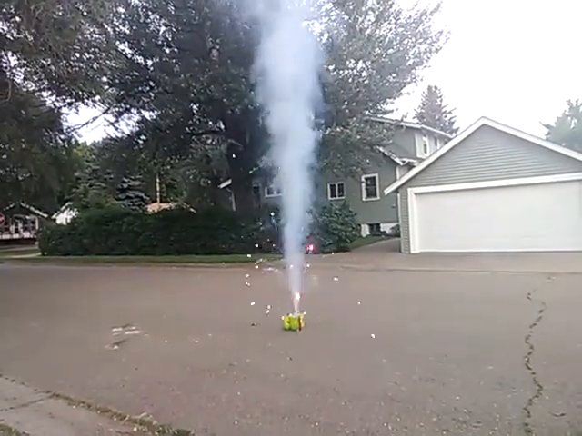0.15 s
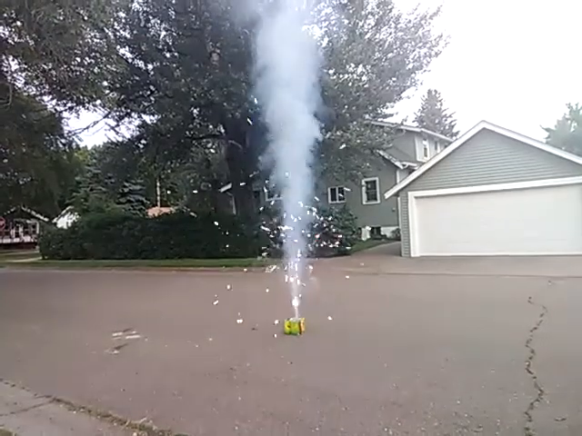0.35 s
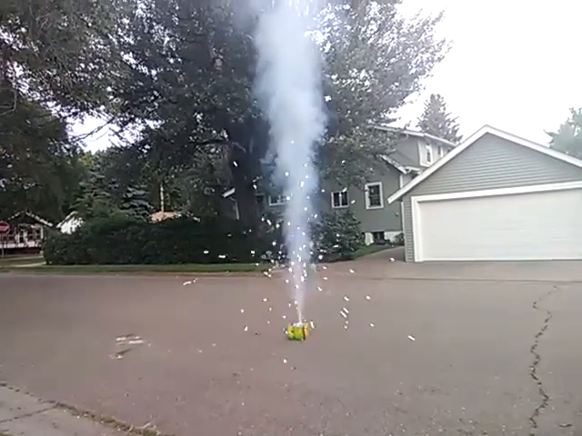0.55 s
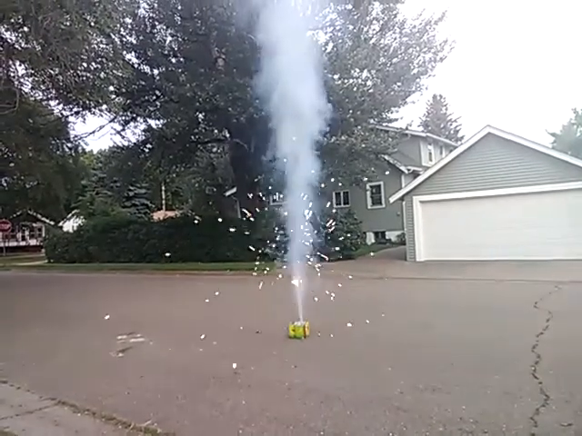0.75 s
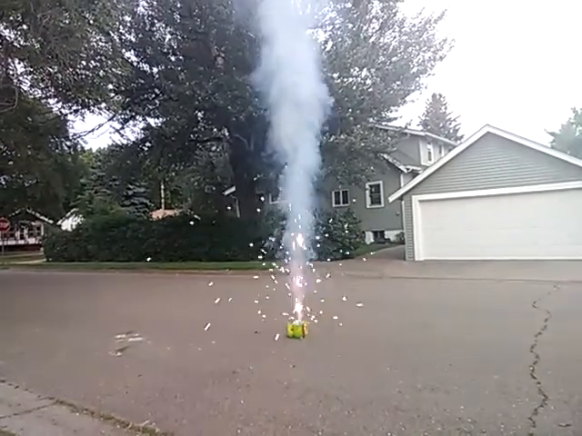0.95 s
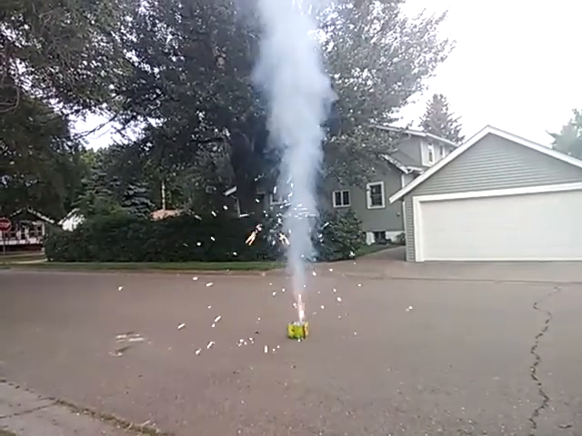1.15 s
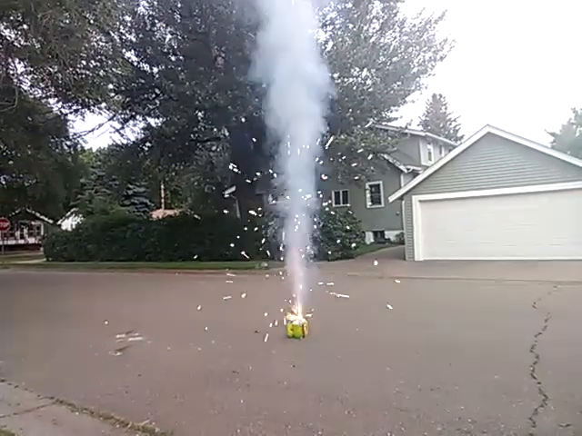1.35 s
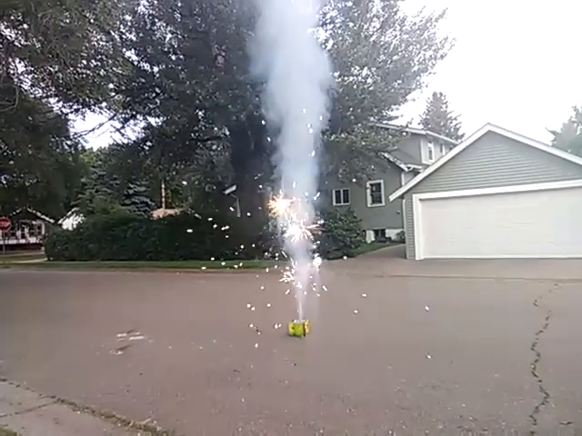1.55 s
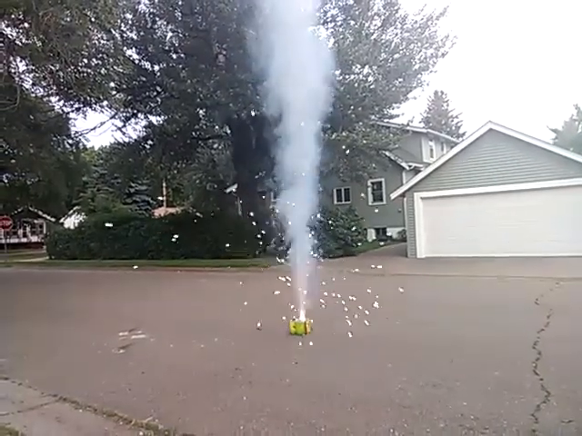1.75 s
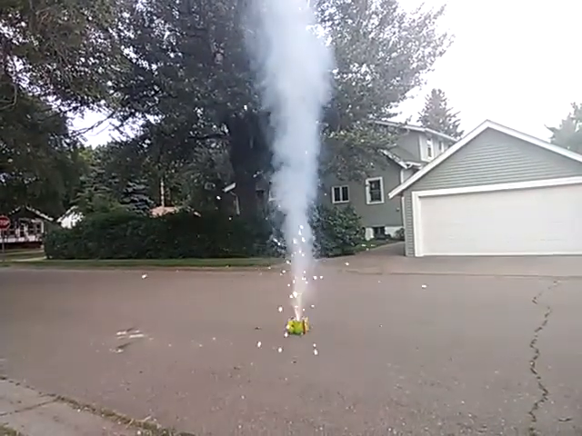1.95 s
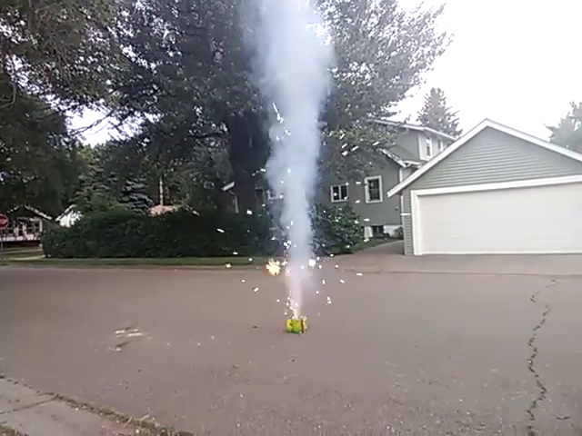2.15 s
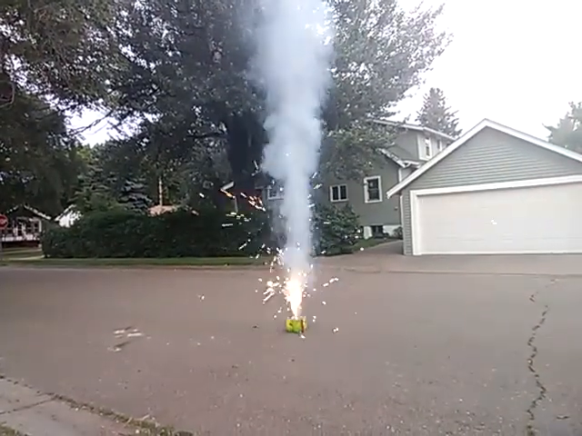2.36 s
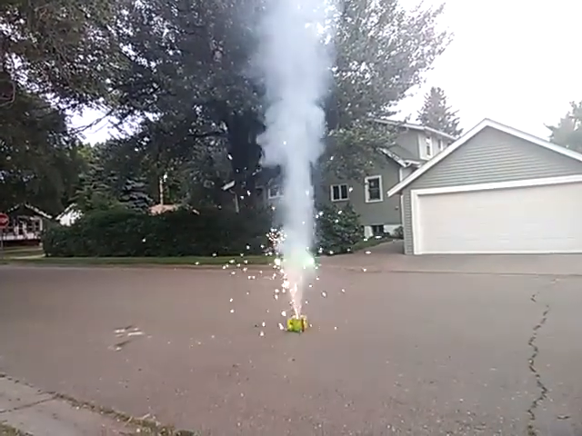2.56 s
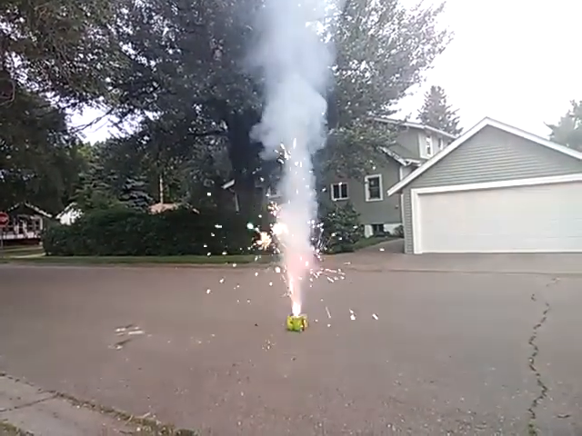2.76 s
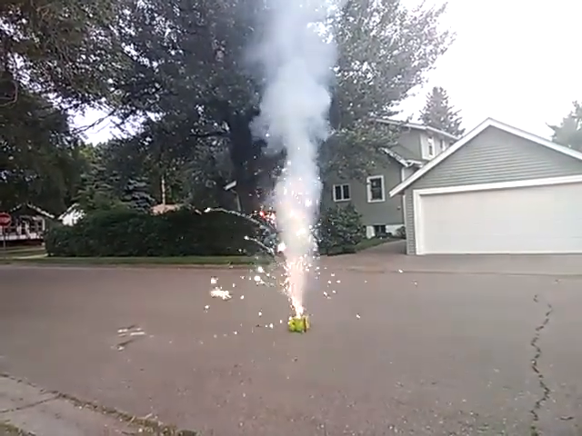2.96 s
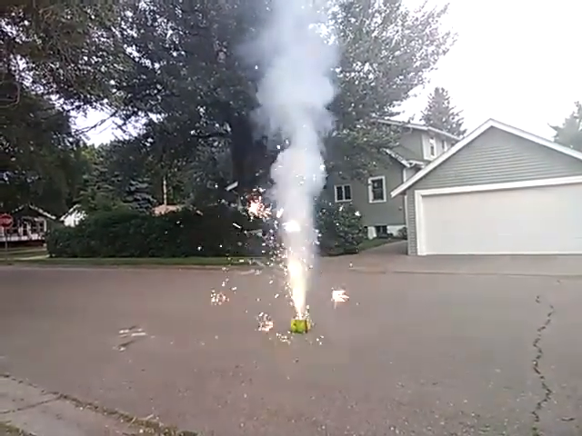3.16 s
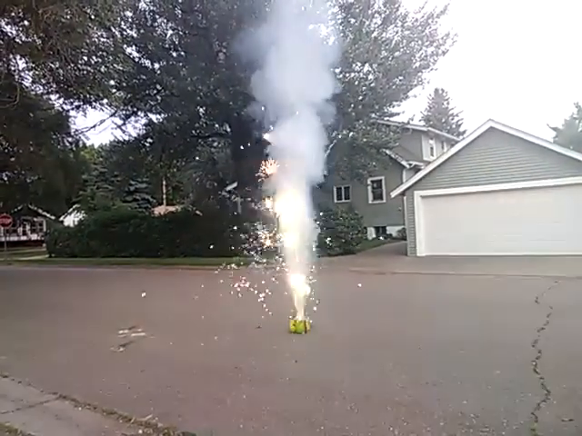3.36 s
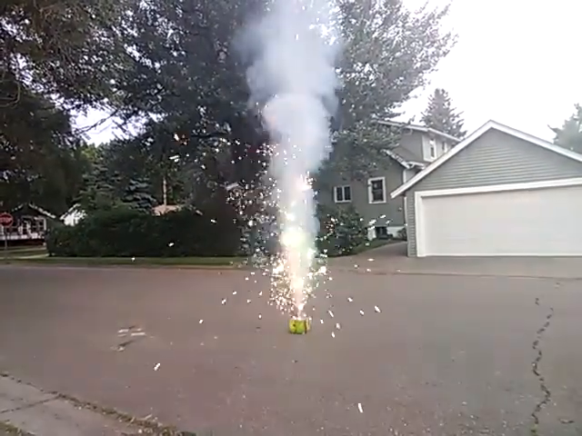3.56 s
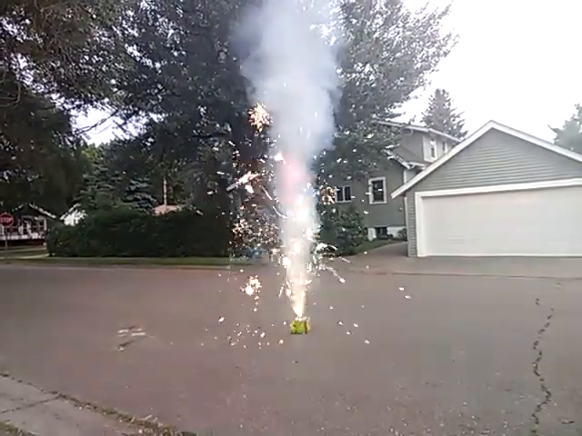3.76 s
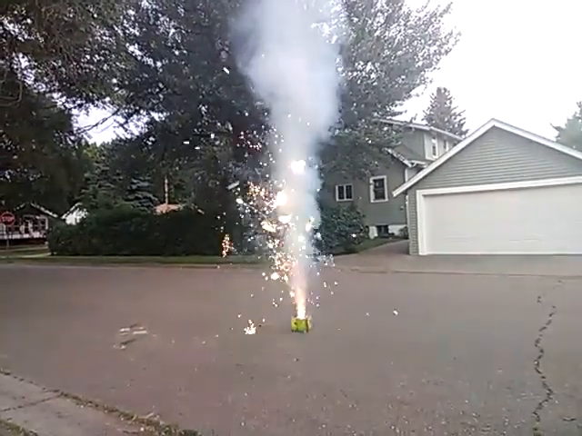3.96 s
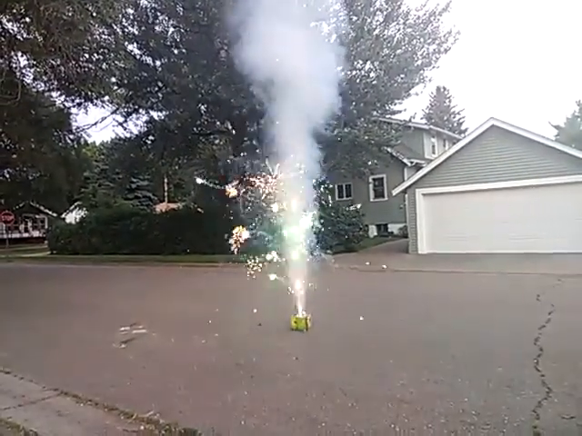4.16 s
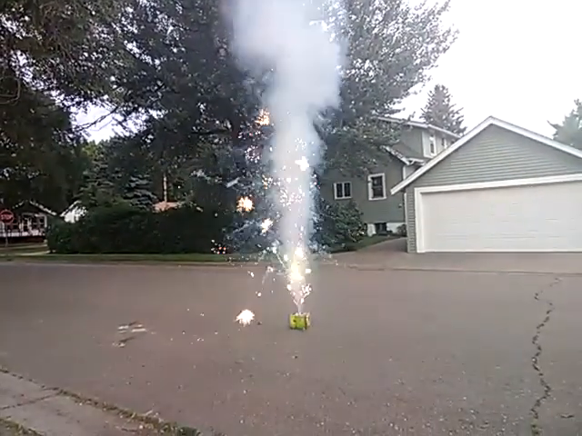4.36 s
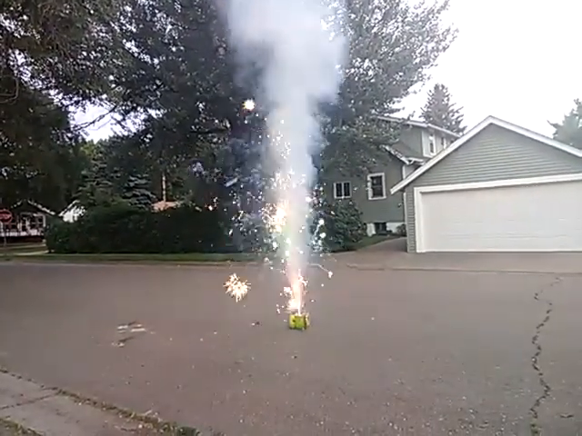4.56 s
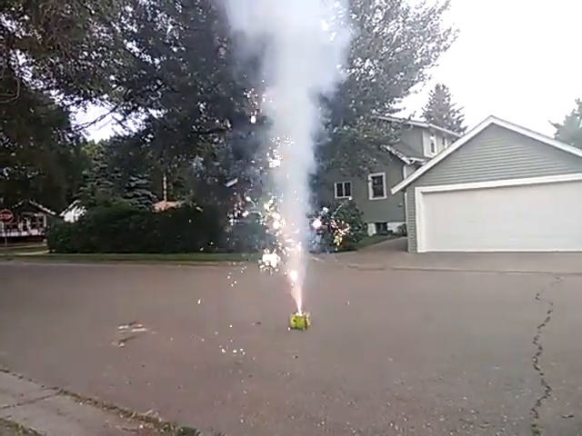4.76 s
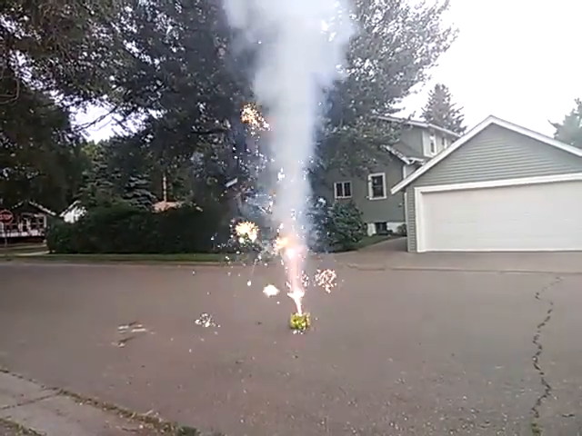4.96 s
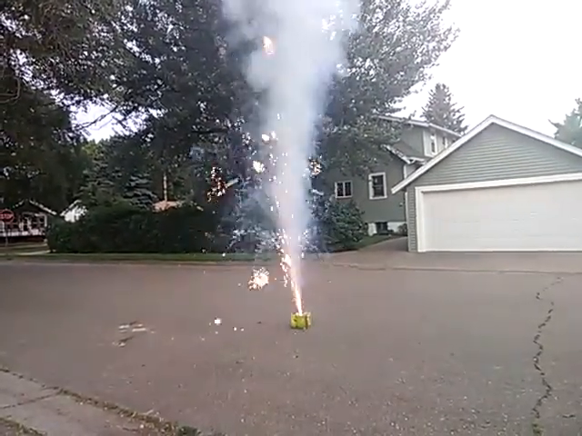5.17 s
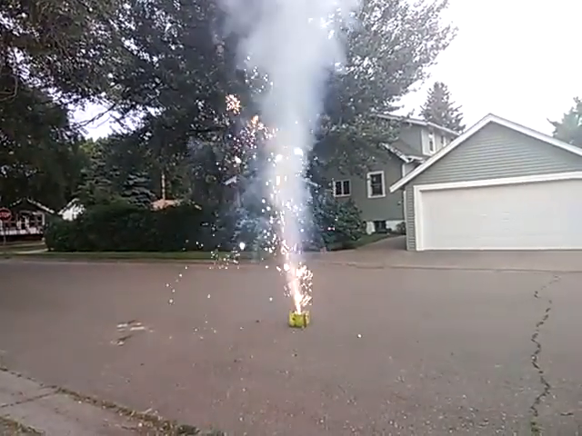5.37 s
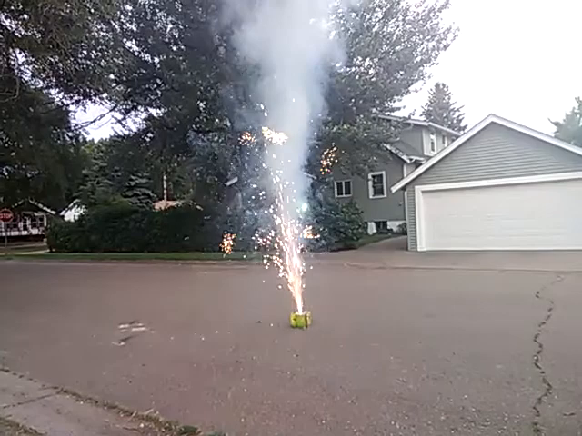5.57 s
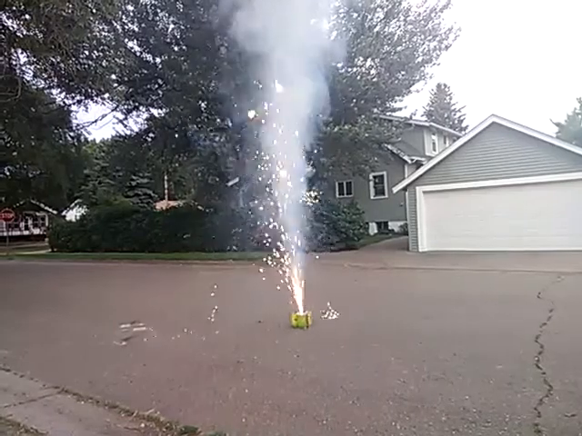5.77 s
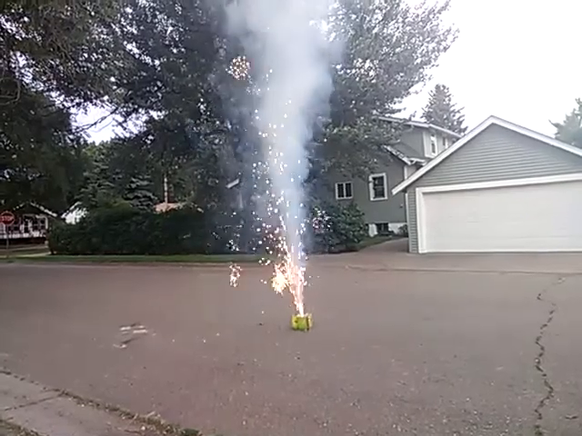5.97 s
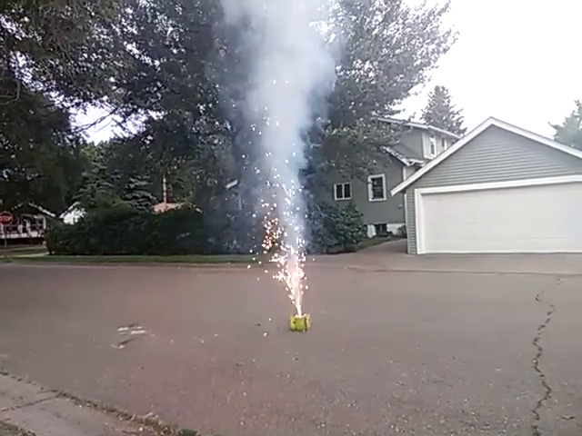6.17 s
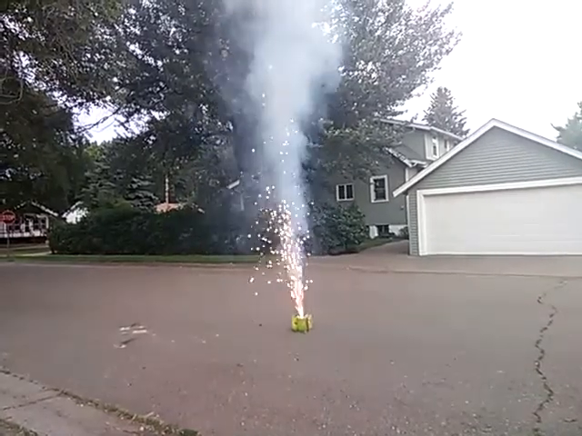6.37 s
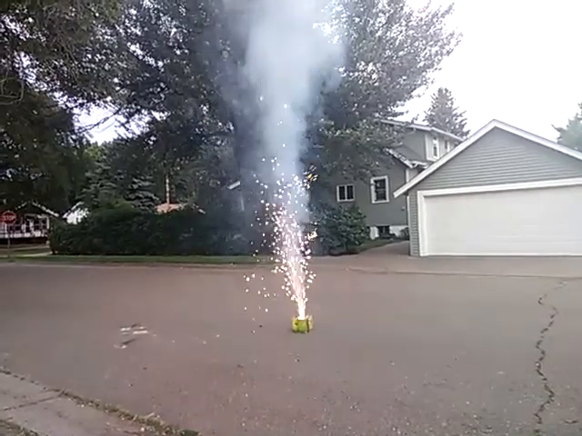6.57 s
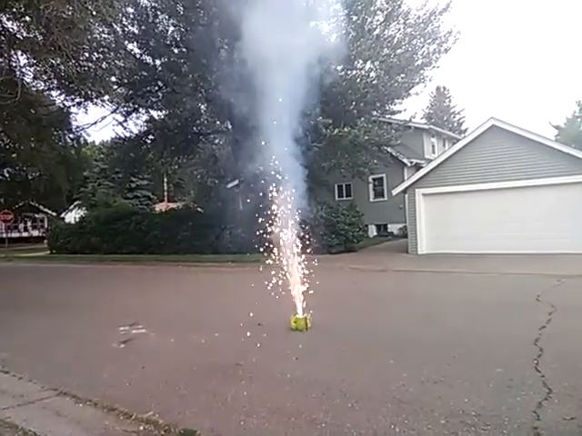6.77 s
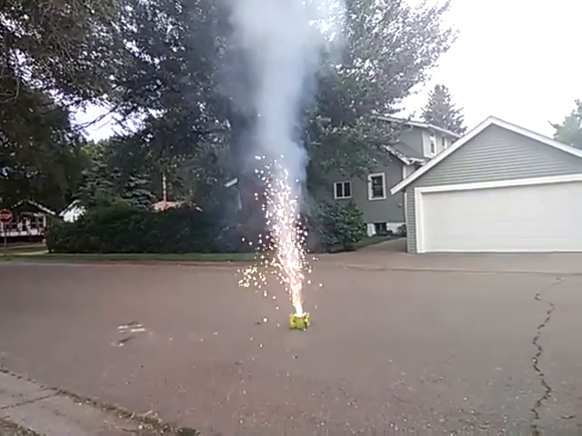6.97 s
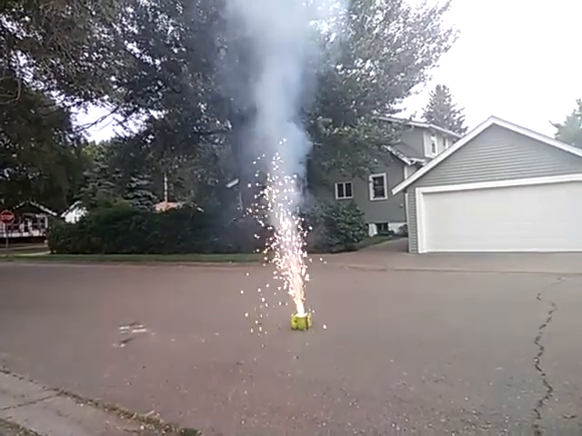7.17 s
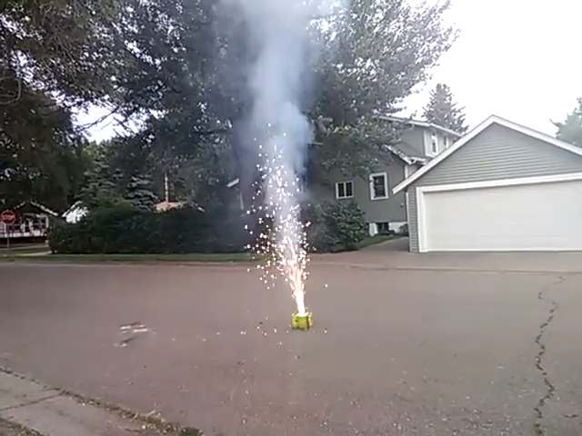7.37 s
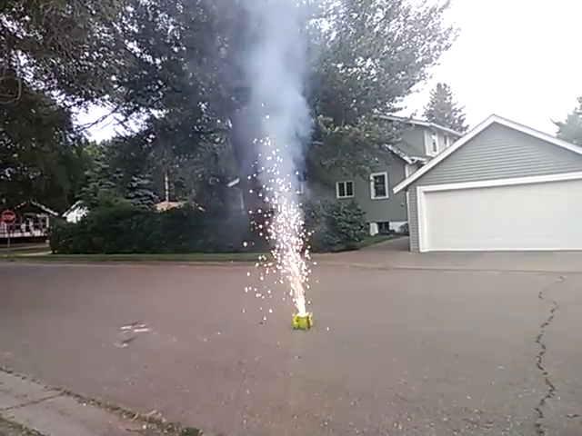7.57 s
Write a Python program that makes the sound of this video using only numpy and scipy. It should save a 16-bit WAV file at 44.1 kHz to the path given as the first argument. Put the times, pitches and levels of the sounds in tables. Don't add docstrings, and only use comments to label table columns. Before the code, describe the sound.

Rapid crackling bangs from a ground firework, bright and dry with thumping air pushes, thicken over the first seconds and bounce quickly off nearby house fronts. Then a lull with soft low gulps and a few ticks, a hissing jet that fades nearly out, coughing spurts, and a rougher, lower rushing roar. Faint street air and town hum lie beneath; close stereo microphone, slightly squashed.

```python
import sys
import numpy as np
from scipy import signal
from scipy.fft import rfft, irfft, next_fast_len
from scipy.io import wavfile
from scipy.ndimage import uniform_filter1d, map_coordinates

SR = 44100
rng = np.random.default_rng(int(sys.argv[2]) if len(sys.argv) > 2 else 0)


def unload_wav(signal):
    wavfile.write(
        sys.argv[1],
        SR,
        np.round(np.clip(np.atleast_2d(signal).T, -1, 1) * 32767).astype(np.int16),
    )


def linear_from_db(decibels):
    return 10 ** (np.asarray(decibels, float) / 20)


N = 335601

# (peak time [s], level [dB], left-right [dB], brightness [dB])
EARLY_STARS = [(0.0119, -18, 2, 1), (0.0239, -23, -11, 0), (0.0361, -15, -1, 0), (0.0627, -28, -1.5, -1),
               (0.0795, -14, -1, 2.5), (0.1928, -17.5, -2, 1), (0.2596, -28, -2, 7), (0.2774, -12, -2, 0.5),
               (0.2843, -9.5, -2, -4), (0.3559, -8.5, -2, 3.5), (0.3727, -10.5, 7, 0), (0.3863, -15, -2, 3),
               (0.4086, -19, 3, -1), (0.42, -6.5, 1, 3), (0.4341, -20, -13, -1), (0.4403, -15, 8, -1.5),
               (0.4717, -25, -5, 12), (0.4857, -13, 4, 1), (0.4906, -7.5, 1, 2.5),
               (0.5062, -11.5, -4, -0.5), (0.5599, -11.5, 2, 0), (0.5741, -28, -5, 6), (0.5807, -33, -8, 8),
               (0.5907, -6.5, 0, 1), (0.5999, -5, -2, -1.5), (0.6115, -9, 5, 1), (0.6162, -25, 2, 4),
               (0.6674, -10, 5, 4), (0.6759, -7.5, 0, 0), (0.6846, -9, -4, 0.5), (0.6992, -17, -2, -1),
               (0.7159, -6, 5, 0), (0.7268, -15, -3, 5), (0.7311, -5.5, 5, 1), (0.751, -21, -5, 5),
               (0.7825, -6.5, 4, 4), (0.7954, -12, 4, 1.5), (0.8063, -21, -2, -3), (0.814, -15, -3, 1),
               (0.8304, -9.5, 1, 0.5), (0.8444, -15, -4, 3), (0.897, -16.5, 1, 2), (0.92, -15.5, -1, -1.5),
               (0.927, -18, 2, -1), (1.0024, -3.5, -2, -1), (1.0105, -6.5, -3, 2.5), (1.022, -10, 3, -2.5),
               (1.0579, -35, -3, -1)]
MIDDLE_STARS = [(1.076, -4.5, 1, 3), (1.089, -4.5, 0, -0.5), (1.103, -16, 7, -2.5),
                (1.1291, -12.5, -2, -3.5), (1.1498, -24, 5, 11), (1.1553, -17, 1, 1), (1.205, -12, -7, 3.5),
                (1.2124, -5.5, 5, -0.5), (1.228, -14, 0, 3.5), (1.242, -12.5, -3, -1), (1.256, -18, 1, 0.5),
                (1.282, -11, 0, 1), (1.295, -11, 1, 3.5), (1.31, -9, -1, 0), (1.3221, -5.5, -1, 2),
                (1.3379, -11, 7, -1), (1.352, -23, -3, 8), (1.36, -13, -5, 0), (1.3744, -24, -8, -4),
                (1.3858, -8.5, 11, 3.5), (1.4039, -3, -4, -3), (1.4191, -11, 0, 3.5), (1.4415, -10.5, 4, 0),
                (1.4571, -23, 5, 3), (1.47, -10.5, -11, -1), (1.494, -8, 0, 1), (1.4983, -9, 2, 0.5),
                (1.5106, -26, 5, -3), (1.5366, -3.5, 3.5, 1), (1.5628, -16, 2, -3), (1.573, -12, -3, 3.5),
                (1.5795, -13.5, 2, -1), (1.5943, -14, 9, 3.5), (1.602, -22, 5, -4), (1.639, -20, -6, 3),
                (1.648, -12, -5, 0.5), (1.6609, -2.5, -1, -1.5), (1.6748, -9, -3, 3), (1.6794, -21, -1, -5),
                (1.685, -23, 3, 7), (1.69, -17, -1, -2), (1.701, -7.5, -5, 1.5), (1.707, -9, 12, 1),
                (1.7332, -15, 4, 1), (1.7444, -17.5, 12, -5), (1.7743, -17.5, 17, -1), (1.7909, -6, -4, -3),
                (1.8147, -17.5, 8, -5.5)]
LATE_STARS = [(1.8722, -24, 16, 0), (1.8921, -14, 4, -1), (1.923, -1, -1, -0.5), (1.9306, -3.5, -1, 5),
              (1.9336, -3, -4, -0.5), (1.943, -23, -1, 7), (1.949, -16, -6, 7.5), (1.9599, -17, -3, 0),
              (1.9903, -12.5, 9, 1.5), (2.0015, -18.5, -5, -2.5), (2.1425, -6.5, -0.5, 1),
              (2.1569, -20, -1, 2.5), (2.2047, -7, -3, 2), (2.2092, -7.5, 9, 3), (2.2199, -11.5, -1, -3.5),
              (2.2348, -17, -1, -1.5), (2.2726, -29, 2, -1), (2.2866, -14, -11, 1.5), (2.3035, -14, 15, 1),
              (2.3801, -6, 0, 2), (2.421, -16.5, -6, -2), (2.429, -6, -1, -2), (2.441, -4.5, 6, 3.5),
              (2.4673, -20, -8, 1), (2.5014, -12.5, 8, 0), (2.512, -13, -11, -1), (2.5467, -22, -2, 2),
              (2.557, -5.5, 2, 0.5), (2.5835, -15, 4, -1), (2.5961, -7.5, -1, 2.5), (2.625, -14, -1, 2),
              (2.709, -13.5, -7, 0.5), (2.7136, -11, 4, -0.5), (2.721, -12, -4, 3.5), (2.7352, -15, 2, 2),
              (2.746, -10, 3, 0), (2.762, -6.5, -4, -1), (2.7768, -6.5, 4, 0.5), (2.7864, -0.5, -3, 1),
              (2.7992, -10.5, -4, 2), (2.8292, -21, 1, -2.5), (2.8539, -4, -2, -0.5), (2.872, -11.5, 2, 4),
              (2.9153, -9.5, -3, -1), (2.9229, -15, -1, 4), (3.0016, -13, -3, 0), (3.0191, -20, 0, 4.5),
              (3.065, -19, 1, -5), (3.0693, -12, -2, 1)]
LAST_STARS = [(3.0769, 0, 0.5, -1.5), (3.0912, -10, -1, -3), (3.1012, -7.5, -1, 0), (3.1149, -2.5, 7, 0),
              (3.143, -15.5, -9, -2), (3.1748, -17, -11, -1.5), (3.1825, -12, -3, 3),
              (3.2008, -30, 3, -7.5), (3.236, -3, -8, -1), (3.285, 1.5, 1, 1), (3.2993, -5, -1, -4.5),
              (3.333, -12, -1, -1), (3.3542, -18, 12, -2), (3.371, -19.5, -5, -5), (3.391, -16.5, -3, -4.5),
              (3.4728, -0.5, 0.5, 0), (3.486, -19, 1, -1.5), (3.54, 0.5, -3, 0.5), (3.557, 0, 11.5, -4.5),
              (3.5837, -14, -5, 4), (3.594, -0.5, -7, -1), (3.6165, 3, 3, 0.5), (3.634, -16.5, -1, -6),
              (3.667, -4.5, 3, 1.5), (3.683, -11, 1, -1), (3.7068, -10, 18, 0.5), (3.7165, -11.5, -11, 1.5),
              (3.7355, -22, -2, -4), (3.7496, -5.5, -3, -2), (3.7892, -7.5, -4, 2.5), (3.8014, -2.5, 3, -1),
              (3.8162, -6, 4, 4.5), (3.8204, -5, 0, 0.5), (3.836, -7, 2, 0), (3.8546, -14, 5, 9),
              (3.869, -9, -3, 0), (3.885, -11, -6, -2.5), (3.8966, -13, 1, 3.5), (3.9213, -26, 3, -7),
              (3.933, -19, -9, 6), (3.9684, -7, 1.5, -0.5), (3.9826, -31, 1, 18), (4.0364, -14, -5, 1),
              (4.1488, -4, -11, -0.5), (4.1651, -2, -8, -1), (4.183, -9, 6, -3), (4.1918, -27, 15, -3),
              (4.2566, -9.5, -0.5, -0.5)]
# (time [s], peak [dB])
BLASTS = [(0.282, -28), (0.563, -4.5), (0.5983, -28), (0.683, -16), (1.09, -13), (1.2153, -41),
          (1.464, -8.5), (1.706, -6), (1.744, 9.5), (1.792, -36), (1.813, -3), (1.9229, 1), (1.968, -11),
          (2.38, -33), (2.5589, -8), (2.5841, -5.5), (2.7844, -7.5), (2.9166, -7.5), (3.069, -2.5),
          (3.075, -27), (3.102, -17), (3.283, 8.5), (3.471, -17), (3.544, 5.5), (3.561, -3), (3.602, -5),
          (3.754, -11), (3.9722, -4.5), (4.175, -11)]
# (start [s], length [s], level [dB], rasp over it [dB])
GUSTS = [
    (6.465, 0.071, -55.5, -8),
    (6.575, .03, -62, -20),
    (6.628, .03, -66, -20),
    (6.685, 0.045, -51.5, -0.5),
    (6.775, .04, -54, -19),
    (6.821, 0.015, -48.5, 3.5),
    (6.841, 0.046, -54, -17),
    (6.912, 0.042, -46, -17),
    (7.128, 0.123, -52.5, -25),
]
# (frequency [Hz], density [dB per Hz])
CRACK = [(710, -21.5), (1200, -7), (1670, -13), (2030, -10), (4280, 0.5), (7080, -2.5), (10700, -0.5),
         (13900, -10.5), (14600, -12), (15600, -30)]
# (frequency [Hz], density [dB per Hz])
RUMBLE = [(20, -53), (42, -16), (68, -8.5), (125, -12), (190, -24.5), (400, -36)]
# (frequency [Hz], likeness [0..1])
POP_ALIKE = [(130, 0.99), (300, 0.89), (640, 0.72), (1400, 0.16), (15000, 0.0056)]
# (frequency [Hz], likeness [0..1])
JET_ALIKE = [(130, 0.98), (640, 0.98), (1400, 0.67), (3100, 0.81), (5000, 0.45), (15000, 0.23)]


def unit(x):
    return x / np.sqrt(np.mean(x ** 2) + 1e-20)


def along(points, hz):
    f, v = np.transpose(points)
    return np.interp(np.log(hz + 1), np.log(f + 1), v)


def gains(rows):
    s, *columns = np.transpose(rows)
    now = np.arange(N) / SR
    return [linear_from_db(np.interp(now, s, db, left=-120, right=-120)) for db in columns]


def wobble(rate):
    coarse = np.arange(0, N + 8, 8)
    knots = rng.standard_normal(int(N * rate / SR) + 6)
    return np.interp(np.arange(N), coarse, map_coordinates(knots, [coarse * rate / SR]))


def filtered(x, response):
    m = next_fast_len(N + SR // 2)
    hz = np.fft.rfftfreq(m, 1 / SR) + 1e-3
    return irfft(rfft(x, m) * response(hz), m)[..., :N]


def rush(spectrum, alike, flutter_db, rate):
    def colour(hz):
        turn = np.arccos(np.clip(along(alike, hz), -1, 1)) / 2
        return linear_from_db(along(spectrum, hz)) * [np.cos(turn), np.sin(turn)]

    mid, side = filtered(rng.standard_normal((2, N)), colour)
    return unit(linear_from_db(flutter_db * wobble(rate)) * [mid + side, mid - side])


def strikes(s, db):
    at = np.clip(np.round(s * SR).astype(int), 0, N - 1)
    return np.bincount(at, linear_from_db(db), N)


def swells(s, db, rise, fall):
    t = np.arange(-SR // 50, SR // 50 + 1) / SR
    shape = np.where(t < 0, np.exp(-(t / rise) ** 2), np.exp(-np.abs(t) / fall))
    return signal.fftconvolve(strikes(s, db), shape, "same")


def fronts(s, db, rise, fall, ring_hz, damping, uneven_db):
    def low_cut(hz):
        return (hz ** 2 / (ring_hz ** 2 - hz ** 2 + 2j * damping * hz * ring_hz)) ** 2

    lean_db = uneven_db * rng.standard_normal(len(s))
    pulses = [swells(s, db + side * lean_db, rise, fall) for side in (1, -1)]
    return filtered(np.array(pulses), low_cut)


def mottled(x, patchy_db):
    z = signal.stft(x, nperseg=128)[2]
    field = uniform_filter1d(rng.standard_normal(z.shape[1:]), size=4, axis=0)
    field = uniform_filter1d(field, size=3, axis=1)
    spots = signal.istft(z * linear_from_db(patchy_db * unit(field)), nperseg=128)[1][:, :N]
    power = np.abs(uniform_filter1d(spots ** 2, size=180))
    return spots / np.sqrt(power + 1e-9)


def arrivals():
    # (peak time [s], level [dB],
    # left-right [dB], brightness [dB])
    further_arrivals = [(.0006, -14.5, 10, 2), (0.097, -26, 7, 3), (0.2098, -30, 4, 8), (0.407, -18, 3, 0),
                        (0.625, -33, 0, 4), (.743, -23, -2, -4), (2.3186, -22, 0, 1), (2.982, -19, -2, 3),
                        (3.2509, -21, 2, -3), (4.051, -31, 0, -3), (2.93, -14, -2, 0.5)]
    # (delay [s], loss [dB], left-right [dB], brightness [dB])
    walls = [
        (-.0007, 4, 2, 0),
        (.0009, 0, 1, -1),
        (0.0171, -8, 2.5, 0.5),
        (.064, -13.5, 4.5, 1.5),
        (0.069, -14.5, -1, 0.5),
    ]
    bursts = np.vstack([EARLY_STARS, MIDDLE_STARS, LATE_STARS, LAST_STARS, further_arrivals]) + [0, 5.5, 0, 0]
    paths = bursts[:, None] + np.array(walls)[None]
    scatter = [0.00047, 3]  # s, dB
    paths[:, 1:, :2] += rng.standard_normal((len(bursts), len(walls) - 1, 2)) * scatter
    return paths.reshape(-1, 4).T


def stars():
    # (frequency [Hz], density [dB per Hz])
    body_colour = [(88, -33), (150, 5.5), (522, -5), (715, 1.5), (1660, -10.5), (2200, -1.5), (2860, -1.5),
                   (4840, -120)]
    s, db, pan_db, tilt_db = arrivals()
    body_db, push_db, low_db = (rng.standard_normal((len(s), 3)) * [3, 4, 4]).T

    def under(hz, edge_hz):
        return 1 / (1 + (hz / edge_hz) ** 6)

    # (share of power, lean of each star in dB)
    parts = [(lambda hz: under(hz, 3200), low_db - 2.67 * tilt_db - 2.5),
             (lambda hz: under(hz, 6500) - under(hz, 3200), -1.3 * tilt_db),
             (lambda hz: 1 - under(hz, 6500), 0.99 * tilt_db)]
    crack = 0
    for share, lean_db in parts:
        noise = mottled(rush(CRACK, POP_ALIKE, flutter_db=2.5, rate=900), patchy_db=2.5)
        noise = filtered(noise, lambda hz: np.sqrt(np.abs(share(hz))))
        level_db = db + lean_db - 1.5
        crack = crack + noise * [swells(s, level_db + side * pan_db / 2, rise=.0003, fall=.001)
                                 for side in (1, -1)]
    body = swells(s, db + body_db - 1.3 * tilt_db - 22.0, rise=0.0019, fall=0.0024)
    body = body * rush(body_colour, POP_ALIKE, flutter_db=1.5, rate=330)
    push = fronts(s, db + push_db - 23.0, rise=0.00024, fall=0.0016,
                  ring_hz=58.6, damping=0.64, uneven_db=2.0)
    return crack + body + push


def blasts():
    s, db = np.transpose(BLASTS)
    return linear_from_db(-6.0) * fronts(s, db, rise=0.000096, fall=0.00079, ring_hz=52.7, damping=0.38, uneven_db=1.5)


def sparks():
    # (time [s], level [dB])
    swarm = [(0, -8.5), (.29, -86), (.55, -21), (1.0, -47), (1.36, -25), (1.6, -27), (2.12, -27.5),
             (2.7, -30.5), (3.1, -33.5), (3.35, -17.5), (3.8, -29.5), (4.25, -23.5), (4.45, -42)]
    families = np.vstack([EARLY_STARS, MIDDLE_STARS, LATE_STARS, LAST_STARS])
    born, parent_db = families.T[:2, :, None]
    wait, size = rng.random((2, len(born), 8))
    s = born - 0.025 * np.log(wait)
    db = 0.4 * parent_db + 20 * size ** 3
    grains = swells(s.ravel(), db.ravel(), rise=0.0005, fall=0.0028)
    crackle = (grains + 0.22) * rush(CRACK, POP_ALIKE, flutter_db=-1.0, rate=11)
    return linear_from_db(3) * gains(swarm)[0] * unit(crackle)


def gusts(db):
    s, length = np.transpose(GUSTS)[:2]
    flow = np.cumsum(strikes(s, db) - strikes(s + length, db))
    return np.abs(uniform_filter1d(flow, int(.011 * SR) + 1))


def jet():
    # (time [s], flow [dB], choke [dB])
    flow = [(0, -61, 18), (4.3, -59, 1), (4.65, -57.5, 16.5), (4.82, -54.5, 7), (4.92, -51, 13.5),
            (5.05, -41.5, 4), (5.3, -43, 9.5), (5.65, -40, 7), (5.86, -44, 7.5), (5.93, -47, 2),
            (6.12, -54, 7), (6.199, -59.5, 4.5), (6.45, -64.5, 14.5), (6.915, -50.5, -1.5),
            (6.93, -36.5, -4), (7.23, -39, -4.5), (7.28, -36.5, -4), (7.61, -31, -10.5)]
    # (time [s], level [dB])
    throb = [
        (0, -47),
        (4.65, -46),
        (4.9, -40.5),
        (6.1, -53.5),
        (6.22, -72),
        (6.45, -65),
        (6.52, -44),
        (6.9, -44.5),
        (7.1, -56),
    ]
    # (time [s], level [dB])
    burble = [
        (5.8, -54),
        (5.98, -46.5),
        (6.13, -55),
        (6.22, -71),
    ]
    # (frequency [Hz], density [dB per Hz])
    roar_colour = [(130, -45), (230, -10), (600, 4), (1100, 5), (1450, -9), (2400, -14.5)]
    rasp_colour = [(1300, -11), (2100, 8.5), (2700, 8.5), (3300, -1), (4000, 3.5), (4900, 6.5), (6500, -37)]
    hiss_colour = [(4500, -7), (5600, 2), (6900, -2), (7200, 5), (8500, 8.5), (9500, 4), (10500, 5),
                   (12000, 0), (14300, -10), (14800, -40), (15400, -92)]
    gurgle_colour = [(90, -25), (190, -1), (380, 1), (650, -49)]
    # (frequency [Hz], lead [rad])
    lead = [(100, 0), (1300, -.6), (2000, -.1), (4000, -.1), (4500, -1.3), (5500, -2.4), (15000, -2.4)]

    s, flow_db, choke_db = np.transpose(flow)
    rasp_over_db = -4.5 - 0.22 * choke_db
    gurgle_over_db = -5.5 - 0.2 * choke_db
    over_db = [0 * s, rasp_over_db, choke_db, gurgle_over_db]
    roar, rasp, hiss, gurgle = gains(np.transpose([s, *(flow_db + over_db)]))
    gust_db, gust_rasp_db = np.transpose(GUSTS)[2:]
    puffs = gusts(gust_db)
    roar = roar + puffs
    rasp = rasp + gusts(gust_db + gust_rasp_db)
    gurgle = gurgle + gains(burble)[0] + linear_from_db(12) * puffs
    rumble = gains(throb + [(N / SR, throb[-1][1])])[0]

    def asphalt(hz):
        return 1 + .65 * np.exp(-(hz / 6000) ** 2 - 1j * np.pi * hz / 1780)

    # (gain, colour, flutter in dB, flutter rate per s)
    layers = [(roar, roar_colour, 1.6, 60), (rasp, rasp_colour, .9, 50), (hiss, hiss_colour, .8, 25),
              (rumble, RUMBLE, 3.5, 14), (gurgle, gurgle_colour, 3, 30)]
    gas = 0
    for gain, colour, flutter_db, rate in layers:
        gas = gas + gain * unit(filtered(rush(colour, JET_ALIKE, flutter_db, rate), asphalt))
    return filtered(gas, lambda hz: np.exp([[.5j], [-.5j]] * along(lead, hz)))


def coughs():
    # (time [s], peak [dB])
    slugs = [(6.469, -33), (6.488, -39), (6.496, -27), (6.579, -29), (6.63, -38), (6.687, -30),
             (6.699, -37), (6.7028, -23), (6.708, -24), (6.7158, -29), (6.78, -28.5), (6.799, -22),
             (6.816, -22), (6.821, -26), (6.832, -25), (6.851, -21), (6.8694, -25), (6.9248, -18.5),
             (6.942, -21), (6.954, -22), (6.964, -29), (7.14, -20), (7.164, -16.5), (7.18, -21),
             (7.201, -23), (7.216, -22)]
    s, db = np.transpose(slugs)
    return linear_from_db(3.5) * fronts(s, db, rise=0.00055, fall=0.0013, ring_hz=130, damping=0.61, uneven_db=1.0)


def gulps():
    # (time [s], peak [dB])
    heaves = [
        (4.435, -33),
        (4.529, -29),
        (4.623, -27),
        (4.646, -28),
        (4.671, -29),
        (4.706, -33),
        (4.811, -42),
        (4.825, -43),
        (4.902, -39),
    ]
    s, db = np.transpose(heaves)
    return linear_from_db(2.5) * fronts(s, db, rise=0.0019, fall=0.0035, ring_hz=79, damping=0.58, uneven_db=1.5)


def strays():
    # (time [s], level [dB], left-right [dB])
    snaps = [
        (4.437, -30, 5),
        (4.5378, -27, -2),
        (4.7034, -35, -13),
        (4.7326, -31, -3),
        (6.0912, -35, -18),
        (6.2844, -35, -2),
        (6.3613, -45, -7),
        (6.5134, -29, -4),
        (6.887, -22.5, 0),
        (6.9205, -27, -8),
    ]
    # (frequency [Hz], density [dB per Hz])
    tick_colour = [(400, -15), (1200, -3.5), (3000, -1.5), (7000, -4.5), (11000, 5.5), (14400, -7),
                   (15600, -10)]
    s, db, pan_db = np.transpose(snaps)
    ticks = [swells(s + 0.0013, db - 3 + side * pan_db / 2, rise=0.00062, fall=0.0041) for side in (1, -1)]
    return ticks * rush(tick_colour, POP_ALIKE, flutter_db=0.5, rate=320)


def street(x):
    # (frequency [Hz], time to fall 60 dB [s])
    decay = [(100, 0.053), (1000, 0.059), (2500, 0.058), (5000, 0.058), (14000, 0.072)]
    out = np.zeros((2, N))
    place = (np.arange(N) // 1200) % 4
    for k in range(4):
        hz, t, (a, b) = signal.stft(rng.standard_normal((2, SR * 3 // 4)), SR, nperseg=256)
        turn = np.arccos(np.clip(along(POP_ALIKE, hz), -1, 1))[:, None] / 2
        mid, side = np.cos(turn) * a, np.sin(turn) * b
        near = linear_from_db(-60 * t / along(decay, hz)[:, None])
        far = linear_from_db(-19 - 60 * t / 0.61)
        onset = 1 - np.exp(-(t / .014) ** 2)
        z = np.array([mid + side, mid - side]) * (near + far) * onset
        tail = signal.istft(z, SR, nperseg=256)[1]
        tail = tail / np.linalg.norm(tail[0])
        answer = signal.oaconvolve((x * (place == k))[:, :5 * SR], tail, axes=1)
        out[:, :answer.shape[1]] += answer
    return np.pad(out, ((0, 0), (150, 0)))[:, :N]


def air():
    # (frequency [Hz], density [dB per Hz])
    hush = [(88, -35), (150, -9), (566, -27), (1100, 7), (1460, 7.5), (2740, -5), (5020, -2), (12500, 4),
            (14000, -8)]
    return linear_from_db(-57) * rush(hush, POP_ALIKE, flutter_db=1.2, rate=20)


def town():
    return linear_from_db(-53.0) * rush(RUMBLE, JET_ALIKE, flutter_db=5, rate=23)


def stunned():
    s, db = np.transpose(BLASTS)
    return linear_from_db(-6 * swells(s + 0.014, db, rise=0.0095, fall=0.0062))


def scene():
    bursts, shoves = stars() + sparks(), blasts()
    heard = bursts + linear_from_db(-8.5) * street(bursts + linear_from_db(1.5) * shoves)
    nozzle = jet() + coughs() + gulps()
    return stunned() * heard + shoves + nozzle + strays() + town() + air()


def levelled(x):
    knee_db, squeeze, react_s = -9.5, 0.57, 0.00061
    power = np.abs(uniform_filter1d(np.mean(x ** 2, axis=0), int(react_s * SR) + 1))
    return x * (1 + power / linear_from_db(2 * knee_db)) ** (-squeeze / 2)


def low_pass(x):
    return signal.sosfilt(signal.butter(12, 15600, fs=SR, output="sos"), x)


def record(dry):
    # (frequency [Hz], left-right [dB])
    ports = [(1500, 0.5), (2400, -1.5), (4400, 5), (8100, -5), (15000, -6)]
    x = filtered(dry, lambda hz: linear_from_db([[.5], [-.5]] * along(ports, hz)))
    x = levelled(x)
    x = x / (1 + np.abs(x / 1.05) ** 4) ** (1 / 4)
    x = filtered(x, lambda hz: np.where(hz < 14350, 1 / (1 + (30 / hz) ** 6), linear_from_db(-32)))
    return low_pass(x)


dry = scene()
out = record(dry)
unload_wav(out)
```